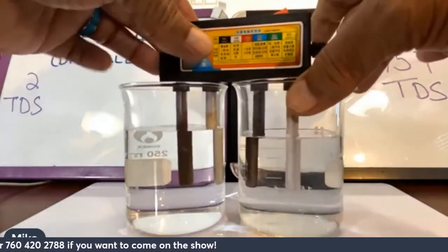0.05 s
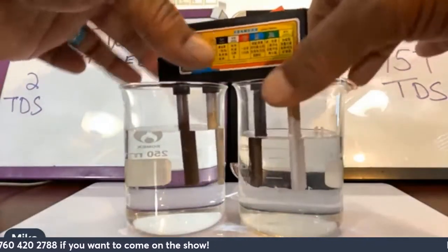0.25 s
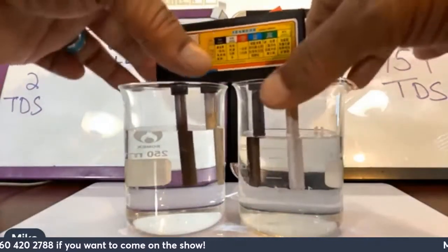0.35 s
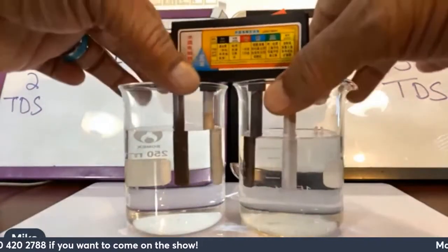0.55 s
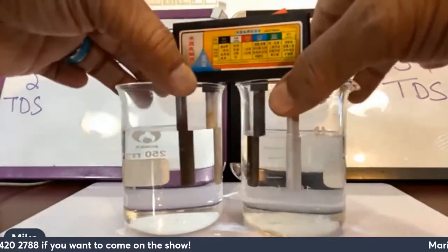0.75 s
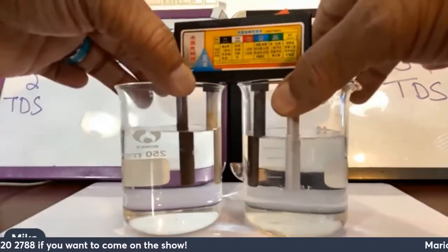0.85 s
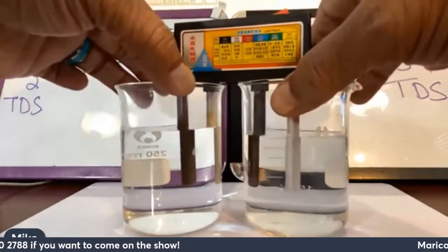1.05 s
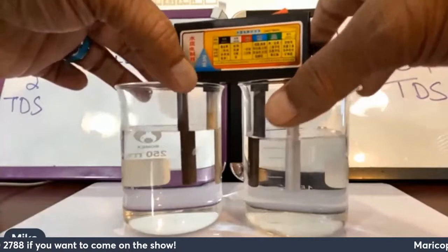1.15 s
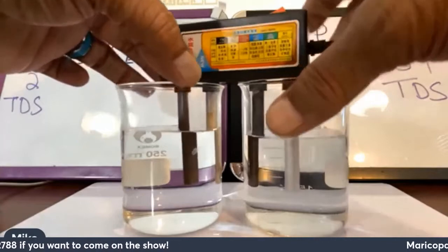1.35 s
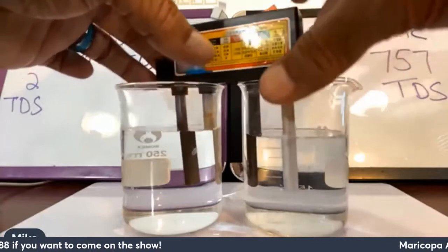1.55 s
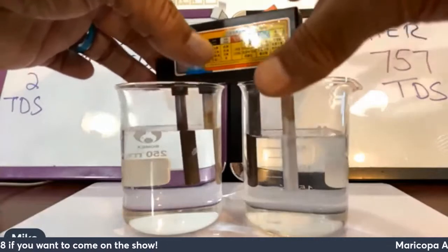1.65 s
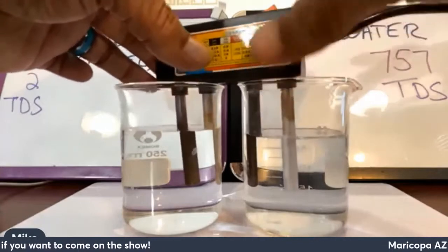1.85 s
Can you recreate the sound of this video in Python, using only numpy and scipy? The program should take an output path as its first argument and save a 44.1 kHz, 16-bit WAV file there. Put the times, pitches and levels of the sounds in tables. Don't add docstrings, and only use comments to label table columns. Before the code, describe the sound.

Metal rods clink on two glass beakers of water: faint ticks, a bright ringing clink, a short scrape, several sharper taps, then a hollow plastic knock, close to the microphone in a small room with faint fan hum.

```python
import sys
import numpy as np
from scipy import signal
from scipy.fft import rfft, irfft, next_fast_len
from scipy.io import wavfile
from scipy.ndimage import uniform_filter1d

SR = 44100
rng = np.random.default_rng(int(sys.argv[2]) if len(sys.argv) > 2 else 0)


def amplitude_ratio(level_db):
    exponent = np.asarray(level_db, float) / 20
    return 10 ** exponent


def to_wav(sig):
    pcm = np.clip(np.atleast_2d(sig), -1, 1) * 32767
    pcm = np.round(pcm).astype(np.int16)
    wavfile.write(sys.argv[1], SR, pcm.T)


N = 83790

RIM_MODES_HZ = [4688, 4982, 5025, 5090, 5723, 6527, 6545, 6768, 8042, 8074, 8183, 8410, 8664, 11288]
# level in dB, t60 in seconds.
RIM_MODES_DB_T60_S = [(-18, .15), (-7, .19), (-10, .19), (-8, .18), (-16, .14), (0, .3), (-12, .2),
                      (-14, .12), (-7, .19), (-7, .19), (-9, .18), (-8, .19), (-10, .17), (-19, .12)]
# frequency in Hz, level in dB, t60 in seconds.
WALL_MODES = [(325, -26, .12), (960, -24, .1), (2638, -28, .09), (3758, -22, .06), (4974, -18, .06),
              (5600, -20, .05), (6438, -17, .18), (6530, -17, .15), (6778, -20, .1), (7985, -9, .1),
              (8048, -12, .16), (8190, 3, .018), (4247, -17, .07), (10350, -20, .05)]
# frequency in Hz, level in dB, t60 in seconds.
HELD_WALL_MODES = [(2632, -10, .15), (4016, -9, .045), (4650, -20, .07), (4867, -22, .07), (5363, -8, .035),
                   (6530, -18, .12), (8600, -14, .04)]
# frequency in Hz, level in dB, t60 in seconds.
HELD_RIM_MODES = [(4151, -17, .05), (4727, -12, .06), (2632, -8, .25), (6530, -9, .2), (8845, -22, .05),
                  (5300, -14, .04)]
# frequency in Hz, level in dB, t60 in seconds.
HOUSING_MODES = [(313, -26, 0.11), (422, -21.5, 0.11), (487, -16.5, 0.075), (1160, -2.5, 0.049),
                 (1274, -10.5, 0.026), (1340, -10, 0.039), (2427, -20, 0.04), (1064, -30, 0.12),
                 (1525, -25.5, 0.065), (1644, -28, 0.07), (1940, -23, 0.021), (2380, -28.5, 0.091)]
# frequency in Hz, level in dB, t60 in seconds.
ROD_MODES = [(1800, -6, .014), (3300, -4, .014), (5100, -14, .012), (6600, -5, .016), (7000, -10, .02),
             (9000, -12, .014), (10300, 0, .013)]
# frequency in Hz, level in dB, t60 in seconds.
SLIP_MODES = [(3600, -17, 0.019), (5160, -16, 0.02004), (6600, -4, 0.029), (7200, -12.5, .04),
              (8500, 1, 0.03), (10320, -1.5, 0.034)]

# start in seconds, ring in dB, crack in dB, crack t60 in seconds.
RIM_TOUCHES = [
    (.2135, -75, -46, .05),
    (.2196, -38, -25, .035),
    (.2236, -34, -25, .02),
    (.2268, -50, -26, .014),
]
# start in seconds, ring in dB, crack in dB, crack t60 in seconds.
WALL_TOUCHES = [
    (.752, -75, -43, .03),
    (.7583, -35, -21, .014),
    (.7612, -70, -24, .014),
    (.7763, -47, -27, .011),
]
# start in seconds, ring in dB, crack in dB, crack t60 in seconds.
HELD_WALL_TOUCHES = [
    (.9195, -70, -50, 0.0085),
    (.9222, -42, -34, .02),
    (.9250, -44, -34, 0.012),
]
# start in seconds, ring in dB, crack in dB, crack t60 in seconds.
HELD_RIM_TOUCHES = [
    (1.1135, -66, -56, 0.029),
    (1.1170, -52, -46, 0.014),
    (1.1215, -80, -47, 0.012),
]
# start in seconds, ring in dB, crack in dB, crack t60 in seconds.
HOUSING_TOUCHES = [
    (1.4645, -58, -54.5, 0.05),
    (1.4752, -51, -44.5, .02),
    (1.4778, -29.5, -37, 0.056),
    (1.506, -52.5, -51, 0.03),
]
# start in seconds, ring in dB, crack in dB, crack t60 in seconds.
ROD_TOUCHES = [
    (.7235, -71, -43, 0.023),
    (.7300, -31, -27.5, 0.014),
]
# start in seconds, ring in dB, crack in dB, crack t60 in seconds.
TICKS = [
    (.1245, -90, -64, .01),
    (.1403, -90, -46, .01),
]
# start in seconds, ring in dB, crack in dB,
# crack t60 in seconds.
SLIPS = [(.6383, -60, -55.5, 0.0041), (.6425, -65, -61.5, 0.024), (.655, -70, -67.5, 0.011),
         (.6722, -59, -64, .01), (.677, -69, -60, .01), (.6977, -58.5, -63, 0.011), (.703, -64, -65, .01),
         (.716, -68.5, -69.5, .01)]
WETNESS_DB = [
    -3,
    -4.5,
    -7,
    -4,
    -8,
    3.5,
    -7.5,
    6.5,
]

# frequency in Hz, density in dB per Hz.
RIM_CRACK = [(760, -50.5), (1100, -9), (1400, -16), (3000, -17.5), (5000, -9), (8500, -7), (12000, -17),
             (15800, -29)]
# frequency in Hz, density in dB per Hz.
WALL_CRACK = [(200, -32), (350, -24.5), (1400, -23.5), (3500, -4.5), (6000, -2), (8200, 6), (11000, -9.5),
              (15800, -41)]
# frequency in Hz, density in dB per Hz.
HELD_WALL_CRACK = [(1000, -40), (1400, -15), (3000, -20), (4000, 0), (5400, 4), (7000, -6.5), (8300, -0.5),
                   (15800, -37.5)]
# frequency in Hz, density in dB per Hz.
HELD_RIM_CRACK = [(1500, -7), (2500, -11), (4900, 7.5), (6500, -5), (8200, -6.5), (10000, -6), (12500, -74)]
# frequency in Hz, density in dB per Hz.
HOUSING_CRACK = [(120, -65), (200, -12), (497, -3.5), (827, -20.5), (1190, -5.5), (1710, -19.5),
                 (7610, -21.5), (9130, -17), (15500, -55)]
# frequency in Hz, density in dB per Hz.
ROD_CRACK = [(290, -76), (500, -37.5), (1740, -12.5), (3380, -10.5), (4250, -11.5), (6540, -4), (7650, -17),
             (10300, -1.5), (14500, -32.5), (15800, -39.5)]
# frequency in Hz, density in dB per Hz.
TICK_CRACK = [(880, -56.5), (1500, -16.5), (4960, -18), (7420, -21), (8140, 3), (10500, -8), (14000, -48)]

# struck in seconds, centre in Hz, split in Hz, level in dB, t60 in seconds,
# first silence in seconds.
BOWL_PAIRS = [
    (.2238, 966.6, 30.1, -53.5, 1.6, .2545),
    (.2238, 2640, 16.4, -50, .66, .269),
]
# struck in seconds, centre in Hz, split in Hz (below zero: the lower
# mode is the weaker), level in dB, t60 in seconds, time of one silence of the beat in seconds.
LATER_PAIRS = [
    (.9225, 8020, 33, -42.5, .125, .954),
    (1.121, 8030, 28, -53, .1, 1.145),
    (1.1165, 5000, 40, -51, .085, 1.129),
    (1.122, 966.6, 30.1, -73, .55, 1.149),
    (1.15, 2640, 8, -86, .4, 1.13),
    (.7583, 8030, -36, -34, .16, .784),
]

# time in seconds, level in dB.
SLIDE_ENVELOPE = [(.6, -91), (.628, -74), (0.639, -56), (.652, -66), (0.702, -61.5), (.722, -65),
                  (.745, -47), (.756, -56.5), (.762, -90.5)]
# frequency in Hz, density in dB per Hz.
SLIDE_SPECTRUM = [(880, -36.5), (1500, -8), (2440, -18.5), (4670, -12.5), (6900, -5), (7810, -8),
                  (9000, -1.5), (10600, -9), (12500, -41), (16200, -59.5), (22000, -120)]
# middle in seconds, length in seconds, centre in Hz, width in Hz, level in dB.
RUSTLES = [(.46, .05, 3400, 900, -80), (.475, .05, 700, 80, -73), (.492, .018, 5000, 200, -80),
           (.515, .018, 4750, 200, -83), (.535, .04, 9000, 3500, -80), (.445, .04, 9500, 2000, -85),
           (.752, .004, 13500, 2500, -66), (.91, .03, 6000, 7000, -73), (1.105, .03, 6000, 6000, -80),
           (1.522, .022, 400, 160, -57), (1.512, .025, 250, 100, -62), (1.512, .012, 8800, 3000, -66)]
# frequency in Hz, density in dB per Hz.
FAN_SPECTRUM = [(15, -43), (25, -30.5), (86, -16.5), (109, -2), (186, -2.5), (253, -7.5), (419, -16),
                (608, -16.5), (1200, -25), (1560, -53.5), (2640, -120)]
# frequency in Hz, density in dB per Hz.
HISS_SPECTRUM = [(700, -20), (1100, -5), (3000, -10), (9000, -14.5), (11000, -18), (12000, -25),
                 (15700, -24.5)]
# start in seconds, end in seconds, gain in dB.
DUCKS = [
    (.33, .53, -6),
    (.85, .895, -8),
    (1.01, 1.07, -3),
    (1.56, 1.7, -4),
]

RIM_STOP_S, WALL_STOP_S, HELD_WALL_STOP_S, HELD_RIM_STOP_S = .265, .83, .962, 1.16
BOWL_STOP_S, UPPER_BOWL_STOP_S = .545, .505
FIRM_STOP_T60_S, SOFT_STOP_T60_S = .045, .16
CRACK_RISE_SHARE = 0.018
UPPER_SHARE, UPPER_LOSS_DB_PER_S = .93, 7
SLIDE_GRAINS_PER_S, SLIDE_GRAIN_SHARE = 250, .4
SLIDE_RING_WIDTH_HZ, SLIDE_RING_DB = 150, 7
ROOM_T60_S, ROOM_DB, ROOM_DELAY_S = 0.17, -9, 0.0046
ROOM_CUT_HZ, RING_TO_ROOM = 11000, .2
MIC_STEP_HZ, MIC_STEP_DB = 12000, -13
FAN_DB, FAN_TONE_HZ, FAN_TONE_WIDTH_HZ, FAN_TONE_DB = -68, 120, 12, -72
HISS_DB, DUCK_EDGE_S = -81, 0.066


def seconds():
    return np.arange(N) / SR


def coloured(spectrum):
    hz, db = np.transpose(spectrum)
    size = next_fast_len(N)
    f = np.maximum(np.fft.rfftfreq(size, 1 / SR), 1)
    gain = amplitude_ratio(np.interp(np.log(f), np.log(hz), db, -90, -90))
    x = irfft(rfft(rng.standard_normal(size)) * gain, size)[:N]
    return x / x.std()


def decay(start_s, t60_s, rise_s=0.00021):
    t = np.maximum(seconds() - start_s, 0)
    return (1 - np.exp(-t / rise_s)) * amplitude_ratio(-60 * t / t60_s)


def stopped(stop_s, t60_s):
    return amplitude_ratio(-60 * np.maximum(seconds() - stop_s, 0) / t60_s)


def blow(touches, modes, crack_spectrum, damping=1):
    ring, cracks = np.zeros(N), np.zeros(N)
    noise = coloured(crack_spectrum)
    chance = rng.random((len(touches), 14, 2))
    for (start_s, ring_db, crack_db, crack_t60_s), draws in zip(touches, chance):
        i = int(start_s * SR)
        t = np.arange(min(N - i, SR // 2)) / SR
        onset = np.minimum(t / 0.0017, 1)
        for (hz, mode_db, t60_s), (strength, phase) in zip(modes, draws):
            level_db = ring_db + mode_db + 1.645 * (strength + 4.0)
            tone = np.sin(2 * np.pi * (hz * t + phase))
            ring[i:i + len(t)] += amplitude_ratio(level_db - 60 * t / t60_s) * tone * onset
        cracks += amplitude_ratio(crack_db) * decay(start_s, crack_t60_s, CRACK_RISE_SHARE * crack_t60_s)
    return ring * damping, noise * cracks


def all_blows():
    rim_modes = np.column_stack([RIM_MODES_HZ, RIM_MODES_DB_T60_S])
    return np.array([
        blow(RIM_TOUCHES, rim_modes, RIM_CRACK, stopped(RIM_STOP_S, SOFT_STOP_T60_S)),
        blow(WALL_TOUCHES, WALL_MODES, WALL_CRACK, stopped(WALL_STOP_S, SOFT_STOP_T60_S)),
        blow(HELD_WALL_TOUCHES, HELD_WALL_MODES, HELD_WALL_CRACK, stopped(HELD_WALL_STOP_S, FIRM_STOP_T60_S)),
        blow(HELD_RIM_TOUCHES, HELD_RIM_MODES, HELD_RIM_CRACK, stopped(HELD_RIM_STOP_S, FIRM_STOP_T60_S)),
        blow(HOUSING_TOUCHES, HOUSING_MODES, HOUSING_CRACK),
        blow(ROD_TOUCHES, ROD_MODES, ROD_CRACK),
        blow(TICKS, HELD_WALL_MODES, TICK_CRACK),
        blow(SLIPS, SLIP_MODES, SLIDE_SPECTRUM)])


def beating_pair(struck_s, hz, split_hz, db, t60_s, silence_s):
    t = seconds() - silence_s
    upper_gain = UPPER_SHARE * amplitude_ratio(-UPPER_LOSS_DB_PER_S * np.maximum(t, 0))
    lower = np.sin(2 * np.pi * (hz - split_hz / 2) * t)
    upper = upper_gain * np.sin(2 * np.pi * (hz + split_hz / 2) * t)
    return amplitude_ratio(db) * decay(struck_s, t60_s, rise_s=0.0015) * (lower - upper)


def bowl():
    low = beating_pair(*BOWL_PAIRS[0])
    high = beating_pair(*BOWL_PAIRS[1]) * stopped(UPPER_BOWL_STOP_S, SOFT_STOP_T60_S)
    return (low + high) * stopped(BOWL_STOP_S, FIRM_STOP_T60_S)


def room(x):
    tail = rng.standard_normal(N) * decay(ROOM_DELAY_S, ROOM_T60_S, rise_s=0.0046)
    tail = signal.lfilter(*signal.butter(1, ROOM_CUT_HZ, fs=SR), tail[:SR // 2])
    return amplitude_ratio(ROOM_DB) * signal.fftconvolve(x, tail / np.sqrt(np.sum(tail ** 2)))[:N]


def top_step(x):
    low = signal.sosfiltfilt(signal.butter(10, MIC_STEP_HZ, fs=SR, output="sos"), x)
    return low + amplitude_ratio(MIC_STEP_DB) * (x - low)


def near_sounds():
    blows = all_blows()
    to_room = amplitude_ratio(np.array(WETNESS_DB)) @ (blows[:, 1] + RING_TO_ROOM * blows[:, 0])
    ring, cracks = blows.sum(axis=0)
    ring = ring + sum(beating_pair(*row) for row in LATER_PAIRS)
    high_pass = signal.butter(2, 200.0, "high", fs=SR, output="sos")
    return top_step(signal.sosfilt(high_pass, ring + cracks + room(to_room)))


def slide():
    time_s, db = np.transpose(SLIDE_ENVELOPE)
    grains = (rng.random(N) < SLIDE_GRAINS_PER_S / SR) * rng.exponential(1, N) ** 2.2
    rough = uniform_filter1d(signal.lfilter([1], [1, -.99], grains), size=60)
    rough = rough / np.sqrt(np.mean(rough ** 2))
    rough = 1 - SLIDE_GRAIN_SHARE + SLIDE_GRAIN_SHARE * rough
    rub = coloured(SLIDE_SPECTRUM)
    singing = 0
    for hz, _, _ in SLIP_MODES:
        singing = singing + signal.lfilter(*signal.iirpeak(hz, hz / SLIDE_RING_WIDTH_HZ, SR), rub)
    rub = rub + amplitude_ratio(SLIDE_RING_DB) * singing
    return amplitude_ratio(np.interp(seconds(), time_s, db, -120, -120)) * rough * rub / rub.std()


def rustles():
    out = 0
    for middle_s, length_s, hz, width_hz, db in RUSTLES:
        edges_hz = [hz - width_hz / 2, hz + width_hz / 2]
        band_pass = signal.butter(2, edges_hz, "band", fs=SR, output="sos")
        band = signal.sosfilt(band_pass, rng.standard_normal(N))
        swell = np.exp(-(2 * (seconds() - middle_s) / length_s) ** 2)
        out = out + amplitude_ratio(db) * band / band.std() * swell
    return out


def fan():
    b, a = signal.iirpeak(FAN_TONE_HZ, FAN_TONE_WIDTH_HZ and FAN_TONE_HZ / FAN_TONE_WIDTH_HZ, SR)
    tone = signal.lfilter(b, a, rng.standard_normal(N + SR))
    tone = signal.lfilter(b, a, tone)[SR:]
    return amplitude_ratio(FAN_DB) * coloured(FAN_SPECTRUM) + amplitude_ratio(FAN_TONE_DB) * tone / tone.std()


def hiss():
    t = seconds()
    x = amplitude_ratio(HISS_DB) * coloured(HISS_SPECTRUM)
    duck_db = 0
    for start_s, end_s, db in DUCKS:
        duck_db = duck_db + db * np.clip(np.minimum(t - start_s, end_s - t) / DUCK_EDGE_S + .5, 0, 1)
    low = signal.sosfiltfilt(signal.butter(2, 2500.0, fs=SR, output="sos"), x)
    return low + amplitude_ratio(duck_db) * (x - low)


def scene():
    return (near_sounds() + bowl() + slide() + rustles() + fan() + hiss())[None]


def low_pass(x):
    return signal.sosfilt(signal.butter(12, 15620, fs=SR, output="sos"), x)


def record(dry):
    return low_pass(dry)


dry = scene()
out = record(dry)
to_wav(out)
```